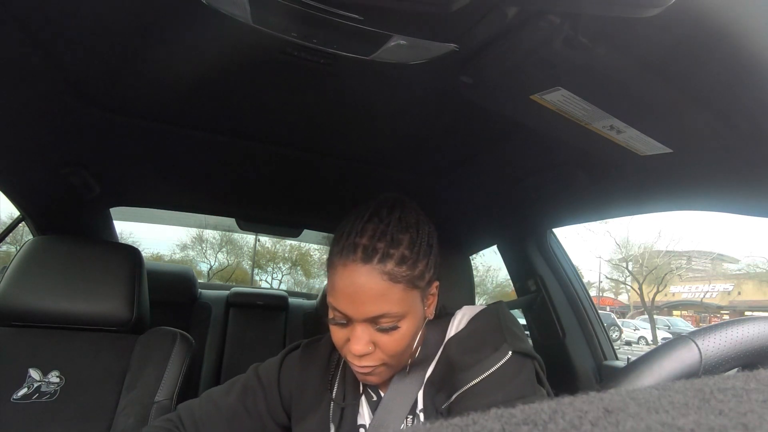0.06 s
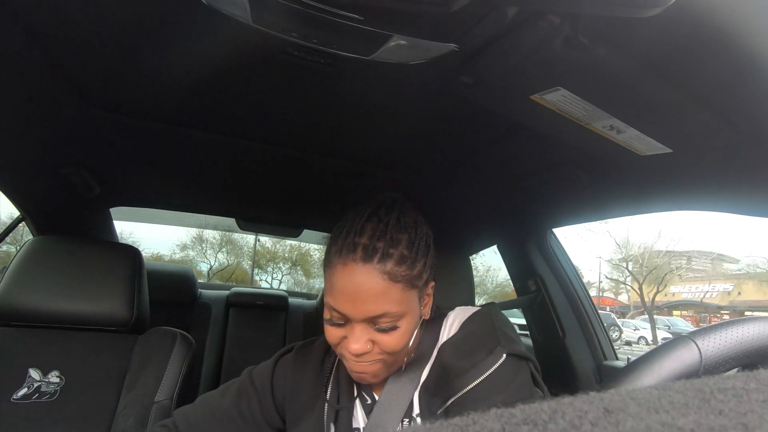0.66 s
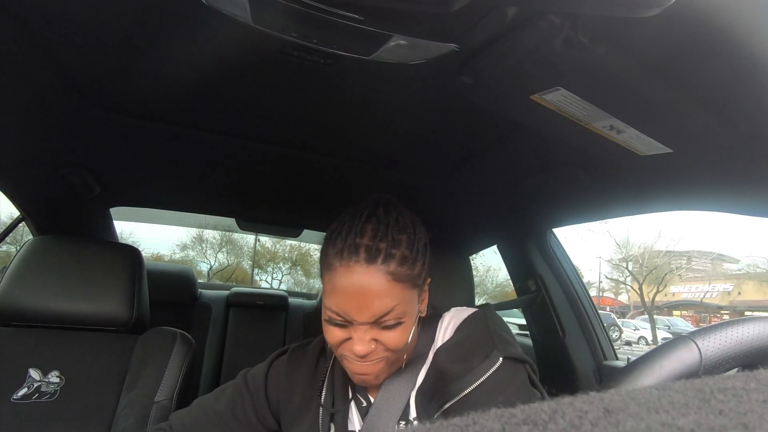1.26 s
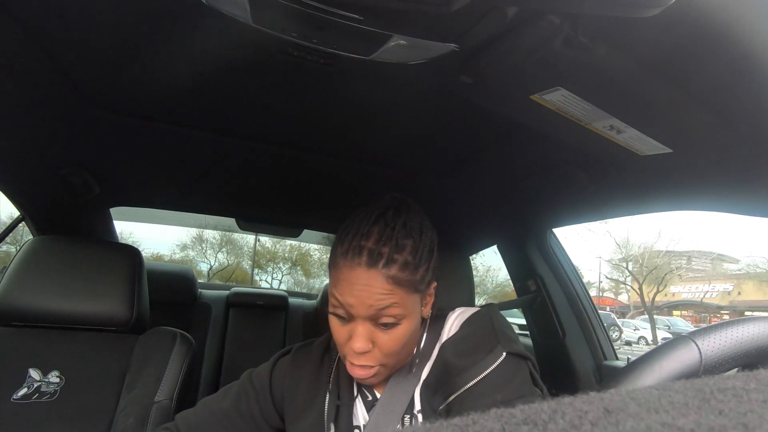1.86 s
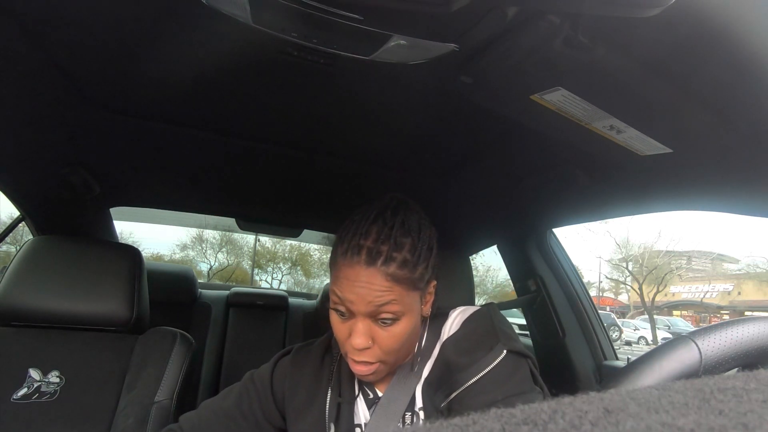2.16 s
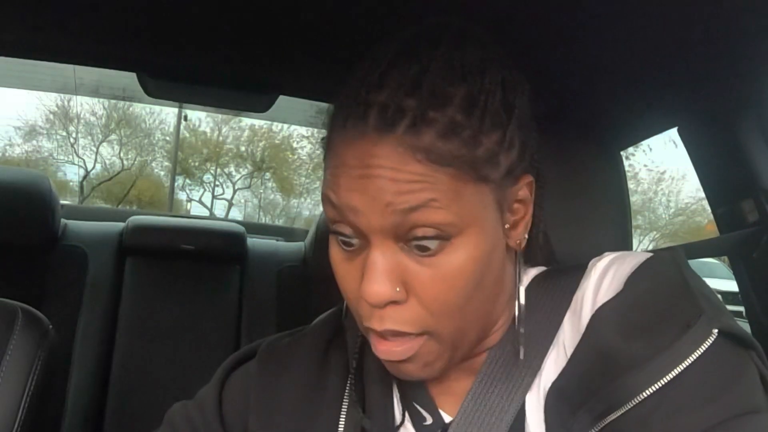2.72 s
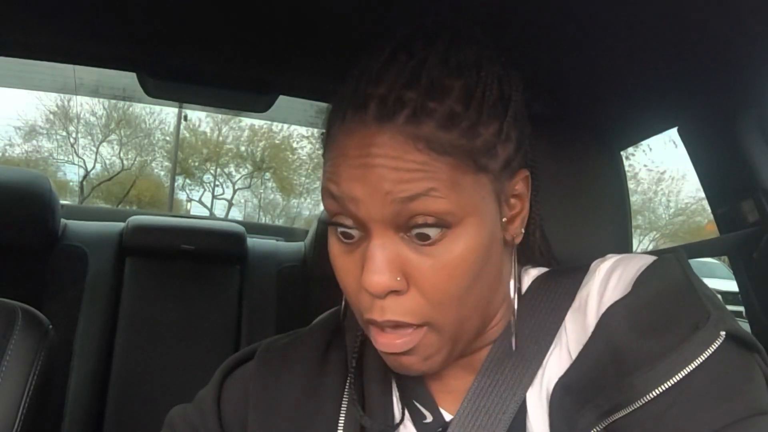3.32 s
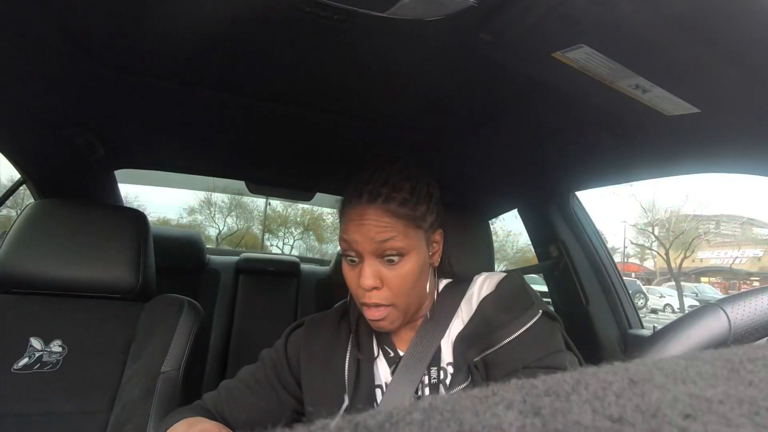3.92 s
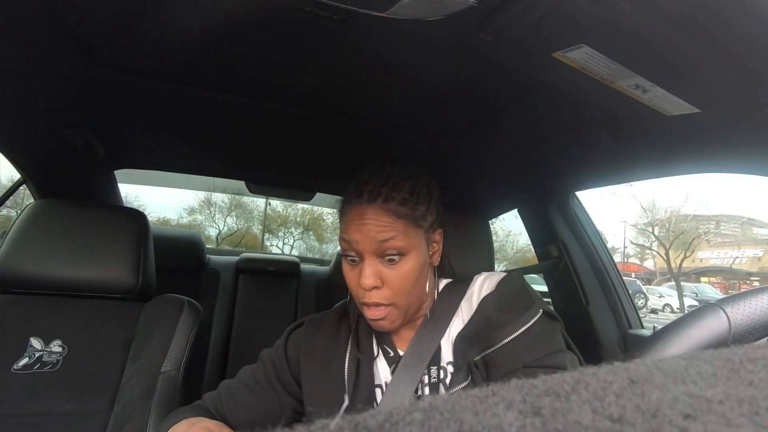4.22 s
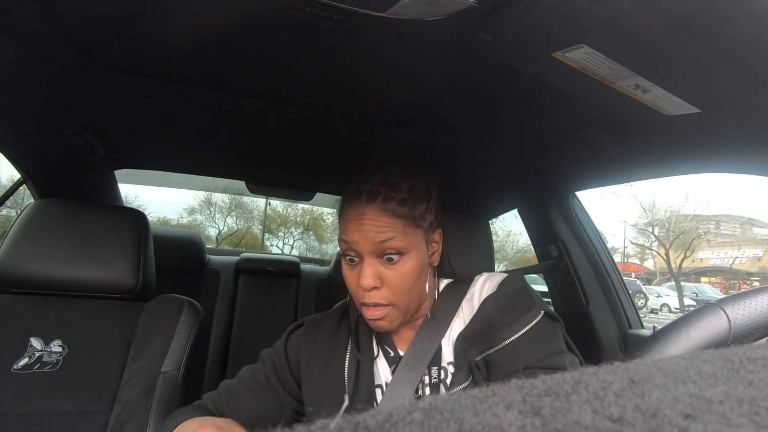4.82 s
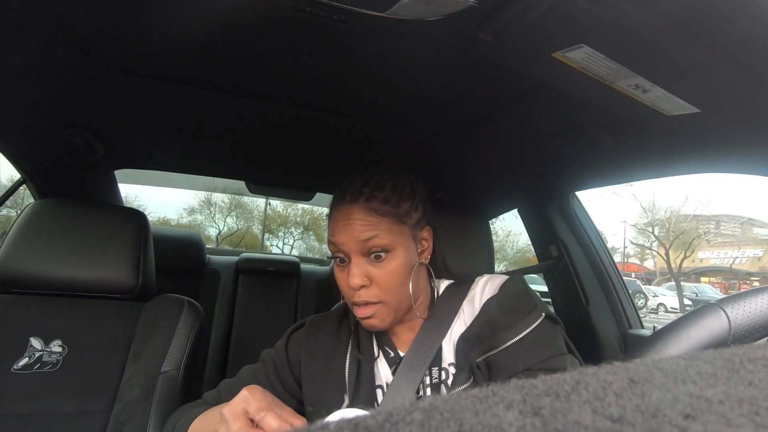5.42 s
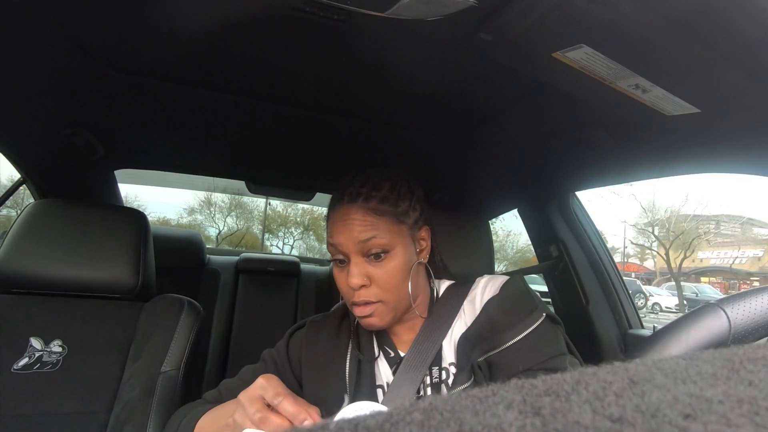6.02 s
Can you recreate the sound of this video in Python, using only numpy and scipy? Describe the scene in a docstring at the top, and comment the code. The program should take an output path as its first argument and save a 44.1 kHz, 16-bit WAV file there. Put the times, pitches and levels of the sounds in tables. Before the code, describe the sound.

Light plastic ticks and paper rustles sound close by over the steady low hum of a car cabin. A cup stuck in its holder buckles and lets go with one sharp snap and a thump, followed by a short, hollow rattle against the console. After a quieter moment, a receipt crinkles against the cup in uneven bursts, mixed with small clicks and faint plastic squeaks. The space sounds small and enclosed.

```python
"""A plastic cup is worked loose from the cup holder of a parked car.
Its thin wall buckles in ticks, rubs and squeaks, then snaps free with a thud in the console.
The rim judders against the holder and the hollow cup rings. A paper receipt rustles and crackles
against the cup throughout, in strokes with the hand's pulls. A low cabin hum runs underneath."""
import sys
import numpy as np
from scipy import signal
from scipy.fft import rfft, irfft, next_fast_len
from scipy.io import wavfile
from scipy.ndimage import uniform_filter1d

SR = 44100
rng = np.random.default_rng(int(sys.argv[2]) if len(sys.argv) > 2 else 0)


def transcribe(signal):
    """Save signal, clipped to [-1, 1], as a 16-bit WAV file at the path in sys.argv[1]."""
    frames = np.atleast_2d(signal).T
    limited = np.clip(frames, -1, 1)
    pcm = np.round(limited * 32767).astype(np.int16)
    wavfile.write(sys.argv[1], SR, pcm)


N = 267731

# Buckles of wall and paper: (time [s], level [dB], treble [dB], ring [Hz], ring height [dB])
BUCKLES = [(0.0925, -22.5, -12.5, 1950, 19), (0.1535, -58, -11, 1820, 16), (0.166, -33, 0, 3150, -11),
           (0.359, -60.5, -18, 1920, 10), (0.412, -65, -17, 3000, 9), (0.542, -49, -33, 1040, 2),
           (0.562, -40.5, -18, 1020, 7.5), (0.7706, -39.5, -15, 1470, 13), (0.825, -33, -15.5, 2720, 7),
           (0.8473, -48, -22, 1380, 21), (0.863, -42, -4, 1740, 20), (0.8812, -36, -6, 1680, 13.5),
           (0.9205, -49.5, -2, 1410, 22), (0.953, -54.5, -15, 2650, 11), (1.0834, -35, -6, 1700, 21),
           (1.1515, -33.5, -9, 1500, 31.5), (1.2936, -32, -11.5, 1920, 11), (1.3196, -28.5, -16, 1800, 19),
           (1.343, -43.5, -1, 2730, 14), (1.5024, -39.5, -14, 1795, 6), (1.5377, -38, -13, 1170, 17.5),
           (1.5676, -43.5, -14, 1080, 8), (1.5874, -36, -14, 1880, 6.5), (1.706, -43.5, 4, 1040, 10),
           (1.796, -38, -10, 1900, 9), (2.102, -39, -21.5, 1010, 7.5), (2.3006, -34.5, 1, 1810, 6),
           (2.3223, -35.5, -15, 1890, 5), (2.7366, -37.5, -10.5, 2650, 1), (3.1264, -41, -8, 2720, 6),
           (3.1417, -42, 0, 2860, 16), (3.1632, -36.5, -2.5, 2800, 10.5), (3.225, -46, -24, 2700, 4),
           (3.297, -49, -17, 2720, 2), (3.329, -32.5, -18, 2650, -3), (3.3762, -40, -12, 1140, 2),
           (3.395, -30.5, -3.5, 1910, 12), (3.416, -30.5, -5, 2760, -2), (3.5401, -37.5, -15.5, 3260, 6.5),
           (3.5788, -43, -37, 1410, -6), (3.6017, -39, -26.5, 2930, 3), (3.686, -39, -20, 2400, 5),
           (3.728, -28, -7.5, 1570, 12.5), (3.861, -36.5, -19.5, 2580, 3.5),
           (3.912, -28, -12.5, 1813, 11.5), (4.0305, -31, -15.5, 2650, 1), (4.0928, -42, -25, 1850, -10),
           (4.2237, -33.5, -22, 2900, 1), (4.2739, -31, -19, 2730, 4), (4.304, -29.5, -25, 1110, 9),
           (4.3367, -32, -29, 2410, -7), (4.372, -31, -9.5, 1820, 3), (4.398, -34.5, -45, 1490, -1),
           (4.4132, -27.5, -15.5, 1760, 4.5), (4.5973, -25.5, -16, 920, 2), (4.661, -36, -19.5, 1020, 7),
           (4.703, -21.5, -10.5, 2740, 3.5), (4.738, -31.5, -14, 1950, 12), (4.8021, -16.5, -8.5, 2350, 6),
           (4.8315, -17, -15, 2320, 5), (4.88, -29.5, -21, 2520, -4), (4.9014, -28, -13, 2460, -1),
           (4.998, -38.5, -28.5, 2050, 4), (5.0502, -42.5, -42, 1520, 13), (5.145, -30, -19.5, 2580, 11.5),
           (5.3777, -34, -9.5, 3220, 3), (5.7125, -28.5, -14.5, 2410, 12), (5.7979, -32.5, -12.5, 2740, -2)]
# Buckle spectrum: (frequency [Hz], gain [dB])
BUCKLE_SPECTRUM = [(100, -12), (350, -18), (580, -19.5), (830, -1.5), (1300, -2), (2200, 0.5), (3000, 2),
                   (4200, -1.5), (5600, -1.5), (7400, 3), (8700, -5), (10000, -10.5), (11200, -18.5),
                   (15000, -30)]


def buckles(gain_db=-9.5, treble_ref_db=-12, left_db=-3):
    """Each buckle rings its own small patch of cup wall or paper."""
    out = np.zeros((2, N))
    for time_s, db, treble_db, ring_hz, ring_db in BUCKLES:
        tick = crack(BUCKLE_SPECTRUM, t60_s=0.065, burst=0.55, late_db=-32, wall_share=0.56,
                     treble_db=treble_db - treble_ref_db, ring_hz=ring_hz, ring_db=ring_db)
        add(out, time_s, amp(db + gain_db) * tick)
    return out * pan(left_db)


# Wall releases: (time [s], level [dB], T60 [s])
SNAPS = [(1.198, -35, 0.073), (1.2086, -5, 0.046)]
# Snap spectrum: (frequency [Hz], gain [dB])
SNAP_SPECTRUM = [(100, -2.5), (350, -0.5), (580, -7), (900, -14.5), (1300, 3.5), (1600, -6.5), (2050, 6),
                 (2750, 0), (3300, -5.5), (5400, -2.5), (6500, -2), (7350, 2.5), (8100, -7), (9600, -12.5),
                 (11000, -26.5), (15000, -37)]


def wall_snaps(gain_db=-8.5):
    """The wall springs free of the holder with a bright pop."""
    out = np.zeros((2, N))
    for time_s, db, t60_s in SNAPS:
        pop = crack(SNAP_SPECTRUM, t60_s, burst=1.8, late_db=-30.5, wall_share=0.32, rise_s=0.0014)
        add(out, time_s, amp(db + gain_db) * pop)
    return out * pan(-0.32)


# Cup against holder: (time [s], level [dB], judder length [s])
KNOCKS = [(0.564, -42.5, 0.0047), (1.21, -22, 0.0055), (1.295, -34.5, 0.006), (1.32, -33, 0.0046),
          (1.84, -30, 0.01), (1.853, -11.5, 0.0053), (1.8575, -16, 0.01), (1.892, -34, 0.007),
          (1.926, -33.5, 0.0066), (1.9703, -34, 0.0066), (2.095, -46, 0.005), (4.274, -50.5, 0.0027),
          (4.336, -56, 0.0056), (4.415, -42.5, 0.0045), (4.547, -42.5, 0.0074), (4.597, -36.5, 0.0026)]
# Hollow cup modes: (frequency [Hz], level [dB], T60 [s])
CUP_MODES = [(339, -22.5, 0.12), (420, -13, 0.074), (520, -19, 0.1), (738, 4.5, 0.047), (753, -2.5, 0.07),
             (990, -14, 0.034), (1000, -5, 0.1), (1110, -10, 0.052), (1248, -5, 0.068), (1570, -21, 0.05),
             (1830, -8.5, 0.092), (1983, -11, 0.069), (2450, -15.5, 0.048), (2600, -9.5, 0.059),
             (2630, -15.5, 0.076)]
# Rim slip spectrum: (frequency [Hz], gain [dB])
RIM_SPECTRUM = [(100, -21), (310, -12), (420, -0.5), (600, -15.5), (760, 6.5), (1200, 6), (1500, -2.5),
                (2500, 1), (3400, -8.5), (5300, -15.5), (6700, -10), (9300, -19.5), (11000, -39),
                (15000, -44.5)]


def cup_knocks(ring_db=-9, scrape_db=-6, fade_db=-3, slips=4):
    """The rim judders over the holder in quick slips while the hollow cup rings."""
    out, t = np.zeros((2, N)), np.arange(8192) / SR
    for time_s, db, judder_s in KNOCKS:
        ring = np.zeros((2, len(t)))
        for hz, mode_db, t60_s in CUP_MODES:
            phase_rad = rng.normal(0, 0.1, (2, 1))
            ring += amp(mode_db - 60 * t / t60_s) * np.sin(2 * np.pi * hz * t + phase_rad)
        attack = 1 - np.exp(-2 * t / judder_s)
        add(out, time_s, amp(db + ring_db) * ring * attack)
        for k in range(slips):
            slip = crack(RIM_SPECTRUM, t60_s=0.085, burst=3.5, late_db=-19, wall_share=0.3,
                         side_db=-0.5, size=4096)
            gain = amp(db + scrape_db + fade_db * k / slips) / np.sqrt(slips)
            delay_s = judder_s * (k + rng.uniform(0, 0.61)) / slips
            add(out, time_s + delay_s, gain * slip)
    return out * pan(-1.9)


# Blows to the console: (time [s], level [dB], tilt [dB/octave])
THUDS = [(0.093, -47, -4), (.564, -32.5, -2), (1.206, -15, -0.9), (1.276, -34.5, -3), (1.32, -35, -15),
         (1.858, -21, 1.2), (1.885, -34, 3), (1.923, -34.5, 3), (4.82, -50, 6.5), (4.854, -51.5, 8.5)]
# Console and cabin air modes: (frequency [Hz], level [dB], time to peak [s])
CONSOLE_MODES = [(81.4, -1, 0.023), (108.4, -10, 0.03), (159, -7.5, 0.012), (214, -9, 0.018),
                 (269, -21, 0.022), (336, -13.5, .011), (413.7, -13, .011), (462, -20.5, 0.011)]


def console_thuds(steepness=3.2):
    """Low modes swell after each blow and die quickly."""
    out, t = np.zeros((2, N)), np.arange(8192) / SR
    for time_s, db, tilt_db_per_octave in THUDS:
        for hz, mode_db, peak_s in CONSOLE_MODES:
            envelope = (t / peak_s * np.exp(1 - t / peak_s)) ** steepness
            level_db = db + mode_db + tilt_db_per_octave * np.log2(hz / 100)
            add(out, time_s, amp(level_db) * pan(-0.5) * envelope * np.sin(2 * np.pi * hz * t))
    return out


# Pulls and twists of the hand: (start [s], length [s], paper level [dB], wall level [dB])
STROKES = [(0, 0.15, -62, -64.5), (0.188, 0.049, -74.5, -66), (0.759, 0.12, -60, -62.5),
           (1.21, 0.1, -56, -52.5), (1.431, 0.18, -70.5, -65), (1.679, 0.096, -61, -62.5),
           (1.875, 0.031, -45, -47), (1.951, 0.077, -58.5, -59.5), (2.193, 0.089, -69, -62.5),
           (2.288, 0.024, -52.5, -57.5), (2.392, 0.043, -55, -62), (2.883, 0.0083, -67, -69),
           (3.005, 0.15, -66, -71.5), (3.359, 0.041, -51, -55.5), (3.494, 0.011, -62, -66),
           (3.553, .17, -74, -73), (3.782, .09, -56, -69), (3.937, 0.081, -54.5, -66),
           (4.203, 0.18, -54.5, -69), (4.543, 0.035, -53.5, -60), (4.657, 0.23, -54, -56.5),
           (5.095, 0.31, -61, -63.5), (5.245, 0.023, -56, -77), (5.478, 0.086, -55.5, -61.5),
           (5.699, 0.056, -56.5, -65.5)]
# Light grip between strokes: (start [s], length [s], paper level [dB], wall level [dB])
GRIPS = [(0, 7.2, -80.5, -74.5), (2.1, 4.4, -80, -80), (4.126, 1.43, -68, -71)]


def hand_levels_db(swell_db_per_s=280, stick_db_per_s=287):
    """Paper and wall friction swell as the hand pulls, hold, and die as the cup sticks."""
    t = np.linspace(0, N / SR, 2048)
    power = np.zeros((2, len(t)))
    for start_s, length_s, paper_db, rub_db in STROKES + GRIPS:
        swell_db = swell_db_per_s * np.maximum(start_s - t, 0)
        stick_db = stick_db_per_s * np.maximum(t - start_s - length_s, 0)
        power += amp(np.array([[paper_db], [rub_db]]) - swell_db - stick_db) ** 2
    return [np.interp(np.arange(N) / SR, t, 10 * np.log10(p + 1e-20)) for p in power]


# Paper rustle spectrum: (frequency [Hz], gain [dB])
PAPER_SPECTRUM = [(200, -25.5), (400, -7.5), (580, -16), (900, -14), (1350, -2), (2000, 1.5), (2400, 3),
                  (2900, 3), (4200, -5), (5600, -6), (7300, -1), (8700, -9), (10000, -12.5), (11200, -25),
                  (14000, -29), (15500, -37.5)]
# Wall rub spectrum: (frequency [Hz], gain [dB])
RUB_SPECTRUM = [(200, -19.5), (550, -20.5), (800, -1.5), (1100, -2.5), (1500, -10), (1900, -2.5),
                (2400, -32), (3500, -31.5), (8000, -39)]


def sliding():
    """Paper rustles brightly; the cup wall rubs with a duller, grainier note."""
    paper_db, rub_db = hand_levels_db()
    paper = friction(PAPER_SPECTRUM, paper_db, slips_per_s=1900, spread_db=6, hiss=0.65, patch_db=2.5)
    rub = friction(RUB_SPECTRUM, rub_db, slips_per_s=800, spread_db=4, hiss=0.4, patch_db=2)
    return (paper + rub) * pan(-1.2)


def friction(spectrum, level_db, slips_per_s, spread_db, hiss, patch_db, cabin_t60_s=0.06):
    """Tiny uneven slips, smeared by the cabin, over a fine hiss; lightly coloured by the wall."""
    t = np.arange(4096) / SR
    strengths = amp(spread_db * np.minimum(rng.exponential(1, N), 4)) * rng.choice([-1, 1], N)
    slips = unit_rms(strengths * (rng.random(N) < slips_per_s / SR))
    cabin = rng.standard_normal((2, len(t))) * amp(-60 * t / cabin_t60_s)
    grains = unit_rms(signal.oaconvolve(slips[None], cabin, axes=1)[:, :N])
    rough = shifting_contact(grains + hiss * rng.standard_normal((2, N)), patch_db)
    coloured = equalise(rough, spectrum, wall_share=0.4)
    return unit_rms(stereo(coloured)) * amp(level_db)


def shifting_contact(x, patch_db):
    """The contact wanders, so patches of the spectrum come and go."""
    frames = signal.stft(x, nperseg=512)[2]
    patches = uniform_filter1d(rng.standard_normal(frames.shape[1:]), size=6, axis=0)
    patches = uniform_filter1d(patches, size=9, axis=1)
    return signal.istft(frames * amp(patch_db * unit_rms(patches)), nperseg=512)[1][:, :N]


# Wall drags, and the low ring after the blow at 4.82 s: (start [s], length [s], centre [Hz], width [Hz], level
# [dB])
SQUEAKS = [(0.748, 0.16, 1440, 446.4, -60.5), (1.927, 0.01, 2760, 250, -46),
           (1.977, 0.084, 1080, 220, -56.5), (2.353, 0.089, 1960, 500, -73), (2.989, 0.13, 2670, 200, -70),
           (3.674, 0.041, 2446, 250, -58.5), (3.899, 0.018, 1450, 400, -48.5),
           (4.821, 0.064, 386, 50, -54.5), (4.95, 0.18, 1520, 350, -65), (5.198, 0.14, 2460, 900, -61),
           (5.436, 0.16, 2500, 900, -59.5)]


def wall_squeaks(size=16384):
    """Each short drag faintly excites one resonance of the wall; one low band rings on after the blow at 4.82
    s."""
    out, hz = np.zeros((2, N)), np.fft.rfftfreq(size, 1 / SR)
    for start_s, length_s, centre_hz, width_hz, db in SQUEAKS:
        band = irfft(rfft(rng.standard_normal((2, size))) * resonance(hz, centre_hz, width_hz))
        drag = stereo(band)[:, :round(length_s * SR)]
        add(out, start_s, amp(db) * unit_rms(drag * signal.windows.tukey(drag.shape[1], 0.6)))
    return out


# Thin wall resonances: (centre [Hz], width [Hz], gain [dB])
WALL_MODES = [(1016, 23, 4.5), (1390, 65, 7), (1480, 20, -2.5), (1740, 95, 7), (1875, 120, 5.5),
              (2110, 93, 4), (2305, 29, -1.5), (2480, 66, 1), (2750, 98, 10.5), (2750, 42, -3),
              (3440, 51, 1), (5200, 130, 2), (7050, 310, 7.5), (6840, 70, 3), (7600, 47, 2),
              (8400, 100, -2.5), (8300, 270, 12)]


def wall_db(hz):
    """The thin wall colours whatever excites it."""
    return sum(db * resonance(hz, centre_hz, width_hz) for centre_hz, width_hz, db in WALL_MODES)


def crack(spectrum, t60_s, burst, late_db, wall_share, treble_db=0, ring_hz=2000, ring_db=-40,
          rise_s=0.00013, burst_s=0.00096, late_t60_s=0.15, side_db=-1, size=8192):
    """A brief burst with dense echoes off dash and glass; rms 1 over the first 5 ms."""
    t, hz = np.arange(size) / SR, abs(np.fft.fftfreq(size, 1 / SR))
    envelope = burst * np.exp(-t / burst_s) + amp(-60 * t / t60_s) + amp(late_db - 60 * t / late_t60_s)
    echoes = rng.choice([-1., 1.], (2, size)) * envelope * (1 - np.exp(-t / rise_s))
    echoes[0, 8] += 1.1  # direct arrival, centred
    shelf_db = treble_db * hz ** 4 / (hz ** 4 + 4500 ** 4)
    patch_ring = np.hypot(1, amp(ring_db) * resonance(hz, ring_hz, width_hz=600))
    magnitude = amp(curve_db(spectrum, hz) + wall_share * wall_db(hz) + shelf_db) * patch_ring
    minimum_phase = np.exp(np.conj(signal.hilbert(np.log(magnitude))))
    sound = stereo(np.fft.ifft(np.fft.fft(echoes) * minimum_phase).real, side_db)
    return sound / np.sqrt(np.mean(sound[:, :round(0.005 * SR)] ** 2))


# Cabin rumble spectrum: (frequency [Hz], gain [dB])
RUMBLE_SPECTRUM = [(11, -50.5), (18, -7), (49, -0.5), (69, 2.5), (85, -3.5), (118, -3.5), (151, -9.5),
                   (172, -3), (221, -7.5), (268, -24.5), (306, -22), (344, -24.5), (381, -24), (541, -46.5),
                   (600, -62), (780, -74.5), (1320, -120)]
# Air noise spectrum: (frequency [Hz], gain [dB])
AIR_SPECTRUM = [(200, 22), (450, 11), (700, 12.5), (1200, 8.5), (1900, -4.5), (2800, -15), (4500, -12),
                (7200, -17), (9000, -14), (11000, -37), (15000, -41)]
# Tones in the hum: (start [s], end [s], frequency [Hz], level [dB])
HUM_TONES = [(0, 1.62, 106.6, -49.5), (0.44, 1.15, 218.5, -51.5), (1.85, 2.85, 72, -50.5),
             (2.1, 3.9, 133.5, -53.5), (3.5, 5.4, 131, -51.5), (3.5, 4.3, 60, -48.5),
             (-0.4, 2.57, 39, -50.5), (5, 6.07, 38, -53)]


def cabin_hum(rumble_db=-45.5, air_db=-65.5, waver_hz=0.67, fade_s=0.05):
    """Steady rumble and faint air noise, with wavering tones that come and go."""
    t = np.arange(N) / SR
    rumble = unit_rms(stereo(equalise(rng.standard_normal((2, N)), RUMBLE_SPECTRUM))) * amp(rumble_db)
    air = unit_rms(stereo(equalise(rng.standard_normal((2, N)), AIR_SPECTRUM))) * amp(air_db)
    tones = np.zeros(N)
    for start_s, end_s, hz, db in HUM_TONES:
        fade = np.clip(np.minimum(t - start_s, end_s - t) / fade_s, 0, 1)
        rms = amp(db + 0.5 * wander(knots_per_s=20))
        phase_rad = 2 * np.pi * np.cumsum(hz + waver_hz * wander(knots_per_s=4.91)) / SR
        tones += np.sqrt(2) * fade * rms * np.sin(phase_rad)
    return (rumble + air + tones) * pan(-0.67)


# Side relative to mid: (frequency [Hz], gain [dB])
SIDE_SPECTRUM = [(60, -15.5), (140, -9.5), (300, -11), (700, 0), (1500, -3), (3000, -2.5), (6000, -2),
                 (12000, 2)]


def stereo(mid_side, side_db=0):
    """Mid and side to left and right: bass shared, treble wide."""
    side = amp(side_db) * equalise(mid_side[1], SIDE_SPECTRUM)
    return np.array([mid_side[0] + side, mid_side[0] - side])


def equalise(x, spectrum, wall_share=0):
    """Filters by a spectrum table and a share of the wall's resonances."""
    size = next_fast_len(x.shape[-1])
    hz = np.fft.rfftfreq(size, 1 / SR)
    gain_db = curve_db(spectrum, hz) + wall_share * wall_db(hz)
    return irfft(rfft(x, size) * amp(gain_db), size)[..., :x.shape[-1]]


def curve_db(spectrum, hz):
    """Interpolates a spectrum table on a log-frequency axis."""
    knots_hz, db = np.transpose(spectrum)
    return np.interp(np.log(hz + 1), np.log(knots_hz + 1), db)


def resonance(hz, centre_hz, width_hz):
    """Peak of height 1; full width at half height."""
    return 1 / (1 + (2 * (hz - centre_hz) / width_hz) ** 2)


def wander(knots_per_s):
    """Slow random curve, rms 1."""
    knots = rng.standard_normal(4096)
    return unit_rms(np.interp(np.arange(N) / SR * knots_per_s, np.arange(len(knots)), knots))


def amp(db):
    """Decibels to gain."""
    return 10 ** (np.asarray(db) / 20)


def unit_rms(x):
    """Scales to rms 1."""
    return x / np.sqrt(np.mean(x ** 2) + 1e-20)


def pan(left_db):
    """Channel gains, left_db being left relative to right."""
    return amp(np.array([[left_db], [-left_db]]) / 2)


def add(mix, time_s, sound):
    """Mixes in a stereo sound at time_s."""
    part = mix[:, max(round(time_s * SR), 0):][:, :sound.shape[1]]
    part += sound[:, :part.shape[1]]


def scene():
    """Cup, paper and cabin together."""
    impacts = buckles() + wall_snaps() + cup_knocks() + console_thuds()
    return impacts + sliding() + wall_squeaks() + cabin_hum()


def record(dry, cutoff_hz=15700):
    """Steep low-pass band limit."""
    lowpass = signal.firwin(301, cutoff_hz, window=("kaiser", 9), fs=SR)
    return signal.oaconvolve(dry, lowpass[None], "same", axes=1)


dry = scene()
out = record(dry)
transcribe(out)
```